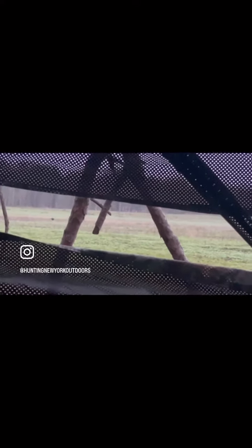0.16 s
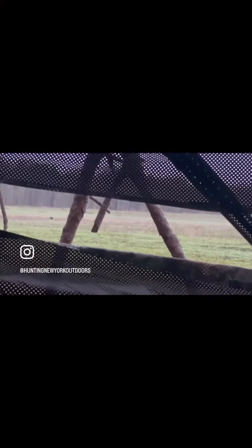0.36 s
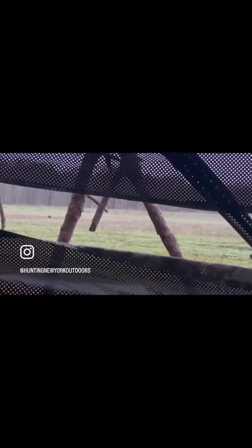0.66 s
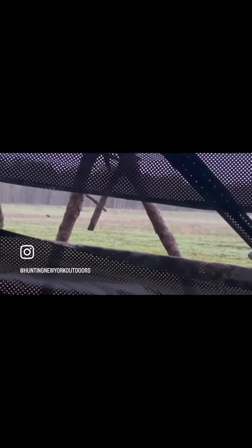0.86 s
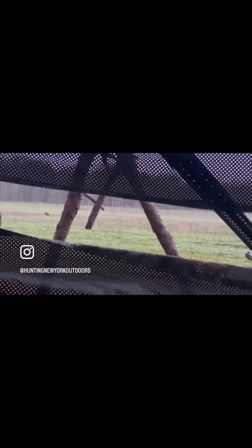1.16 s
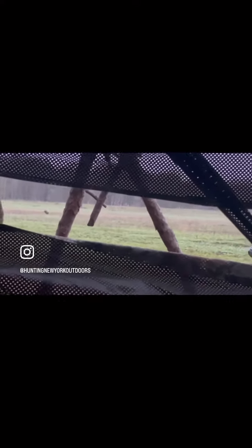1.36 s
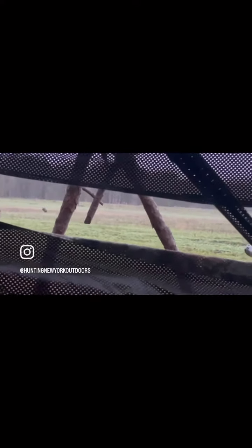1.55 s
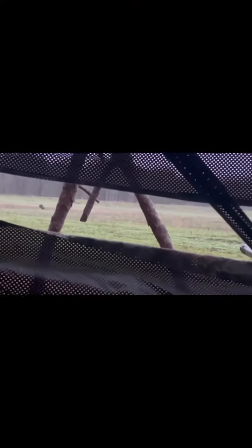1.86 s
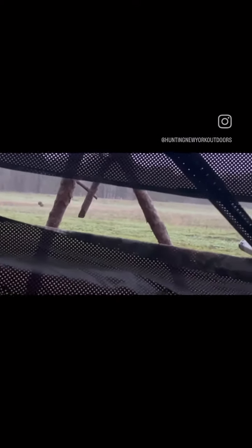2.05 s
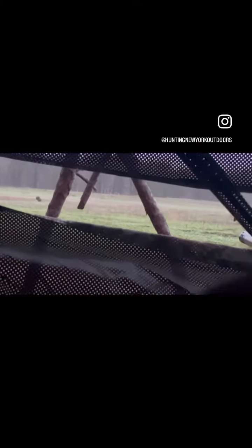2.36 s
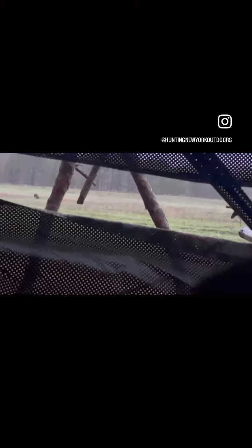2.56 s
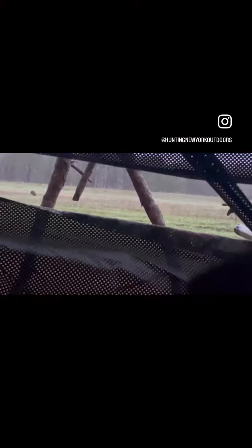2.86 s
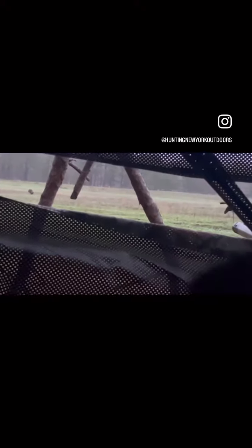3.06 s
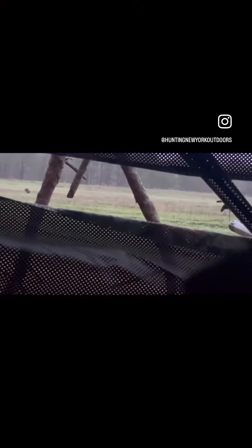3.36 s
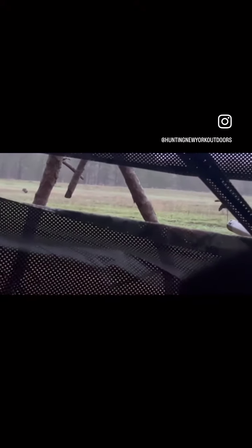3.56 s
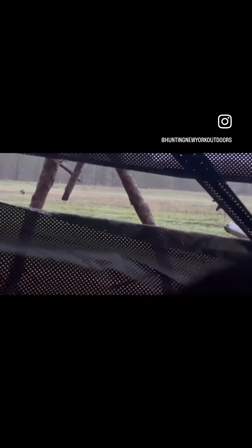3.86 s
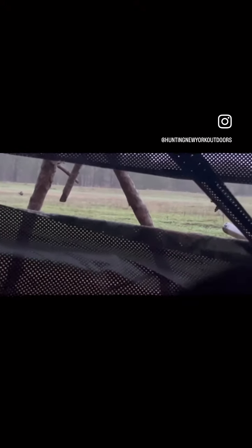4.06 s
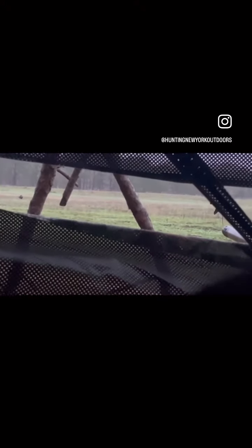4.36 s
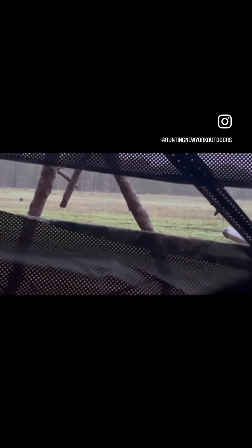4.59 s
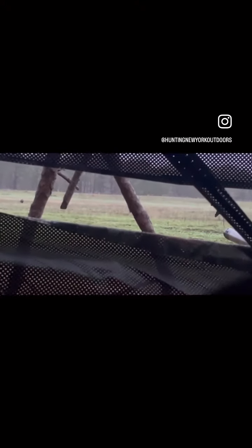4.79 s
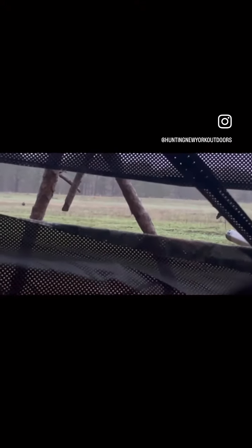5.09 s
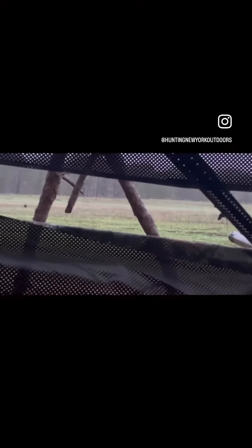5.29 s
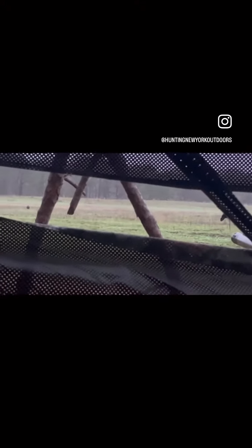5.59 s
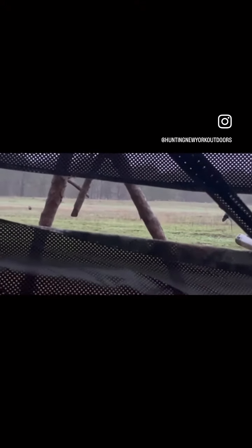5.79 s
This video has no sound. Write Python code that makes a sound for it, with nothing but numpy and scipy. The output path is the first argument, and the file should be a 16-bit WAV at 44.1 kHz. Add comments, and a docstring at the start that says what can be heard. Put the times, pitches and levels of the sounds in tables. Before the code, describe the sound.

A quiet outdoor bed of low rumble and faint thin hiss, heard from within a fabric blind at a field's edge. Very faint and far off, a songbird gives a fast run of falling high chirps from 0.1 to about 2.5 s, then a slower run of hooked, upswinging syllables from 3.1 to 4.5 s. Another bird drops short sliding whistles, clearest near 0.8, 1.5, 4.0 and 4.6 s, with woodland echo. Close by, fabric rustles in soft strokes, strongest at 2.3, 2.9, 4.0 and 4.3 s, with dull little bumps; tiny sharp gear ticks fall at 1.2, 2.0, 2.5, 3.4 and 5.2 s. From 5.2 to 5.9 s a turkey gives four loud, raspy yelps, each 0.1 to 0.16 s, breaking from a thin whistle into a buzzing low note. The gaps widen slightly; a faint low thump closes the last while the rumble dips.

```python
"""At the edge of a field, close to a fabric hunting blind, a turkey gives four loud, raspy yelps.
Each is a membrane buzzing into a throat: a thin whistle that breaks down into a rough low note.
Before them one songbird trills and another whistles far off, as gliding near-sines with echoes.
The fabric rustles and bumps as coloured noise, gear ticks as short noise bursts,
and beneath lie a thin hiss and a low outdoor rumble, which is turned down during the yelps."""
import sys
import numpy as np
from scipy import signal
from scipy.fft import rfft, irfft, next_fast_len
from scipy.io import wavfile
from scipy.ndimage import uniform_filter1d

SR = 44100
rng = np.random.default_rng(int(sys.argv[2]) if len(sys.argv) > 2 else 0)


def wav_out(sig):
    """Save sig, one row per channel (or a flat mono array), as 16-bit PCM at SR to the path in sys.argv[1]."""
    wavfile.write(sys.argv[1], SR, np.round(np.clip(np.atleast_2d(sig).T, -1, 1) * 32767).astype(np.int16))


N = 261513
TIME = np.arange(N) / SR
CUTOFF_HZ = 15650  # upper limit of the voice's partials and of the recorded band


def amp(db):
    """Level: every 20 dB is a factor of ten in amplitude."""
    return 10 ** (np.asarray(db) / 20)


def unit(x):
    """Normalization: scales the mean power to 1."""
    return x / np.sqrt(np.mean(x ** 2) + 1e-20)


def read(points, hz, axis=1):
    """Interpolation: reads a column of a spectrum on a log-frequency axis."""
    rows = np.array(points)
    return np.interp(np.log(hz + 1), np.log(rows[:, 0] + 1), rows[:, axis])


def curves(rows, t):
    """Interpolation: reads every column of a timed table at the times t."""
    s, *columns = np.transpose(rows)
    return [np.interp(t, s, column) for column in columns]


def add(mix, s, sound):
    """Superposition: sums a sound into the mix from time s."""
    part = mix[max(round(s * SR), 0):][:len(sound)]
    part += sound[:len(part)]


def bins(x):
    """Fourier analysis: the frequencies of the spectrum of x."""
    return np.fft.rfftfreq(x.shape[-1], 1 / SR)


def colour(x, points):
    """Linear filtering: multiplies the spectrum by a frequency response."""
    return irfft(rfft(x) * amp(read(points, bins(x))), x.shape[-1])


def noise(points, size):
    """Filtered noise: white noise shaped by a spectrum, at rms 1."""
    white = rng.standard_normal(next_fast_len(size))
    return unit(colour(white, points)[:size])


def wander(size, hz):
    """Random modulation: low-passed noise of rms 1, up to about hz."""
    white = rng.standard_normal(size)
    smooth = irfft(rfft(white) * np.exp(-(bins(white) / hz) ** 2), size)
    return unit(smooth)


def steady(x, size=260):
    """Envelope flattening: divides a sound by its short-term rms."""
    power = uniform_filter1d(uniform_filter1d(x ** 2, size), size)
    return x / np.sqrt(np.abs(power) + 1e-12)


def scatter(x, t60, delay):
    """Diffuse scattering: sparse echoes of random sign, each band decaying at its own rate."""
    taps = rng.choice([-1., 1.], SR) * (rng.random(SR) < .1) * (TIME[:SR] > delay)
    hz, t, z = signal.stft(taps, SR, nperseg=256)
    decay = amp(-60 * t / read(t60, hz)[:, None])
    tail = signal.istft(z * decay, SR, nperseg=256)[1]
    return signal.fftconvolve(x, tail / np.linalg.norm(tail))[:N]


# the yelps: start_s, length_s, attack_s, level_db, sag_db_per_s, middle_swell_db,
# whistle_softening_db_per_octave, treble_db, treble_fade_db_per_s, open_beak_hz
YELP_ROWS = [(5.2105, .1035, .0135, -13.2, 90, 1, 2, -22.3, -55, 4700),
             (5.331, .102, .017, -10.3, 200, 14, 7, -21.7, 60, 3800),
             (5.506, .143, .022, -18.6, -70, 16, 1, -34, 95, 3850),
             (5.758, .159, .042, -13.2, -45, 22, 2, -34, 57, 4850)]
# the membrane of each yelp, from whistle to low note: time_s, pitch_hz, rasp (0-1)
MEMBRANE_CURVES = [
    [(5.213, 2250, .1), (5.222, 2060, .05), (5.226, 740, .8), (5.234, 722, .5), (5.245, 710, .04),
     (5.258, 709, .2), (5.275, 770, .85), (5.29, 919, .35), (5.298, 880, .85)],
    [(5.335, 1790, .5), (5.346, 1800, .15), (5.349, 990, .12), (5.357, 945, .025), (5.368, 972, .008),
     (5.38, 974, .008), (5.391, 990, .06), (5.402, 1037, .07), (5.42, 1065, .8)],
    [(5.515, 2120, .08), (5.523, 1570, .04), (5.548, 1100, .12), (5.572, 795, .5), (5.597, 701, .7),
     (5.607, 898, .35), (5.622, 822, .95)],
    [(5.77, 2800, .08), (5.781, 1920, .03), (5.802, 2010, .01), (5.807, 725, .97), (5.83, 698, .26),
     (5.848, 698, .08), (5.877, 682, .3), (5.889, 600, .97)],
]
# a tiny pip as the voice catches on the last yelp: start_s, length_s, first_hz, last_hz, level_db
CATCH_PIP = (5.766, .011, 3300, 2400, -45)
# a low falling tone of the voice that ends the last yelp: start_s, length_s, first_hz, last_hz, level_db
END_GLIDE = (5.84, .066, 240, 140, -34.5)
# echo decay of the open field: frequency_hz, t60_s
FIELD_DECAY = [(200, .2), (1000, 0.067), (3000, 0.12), (10000, 0.05)]
# response of two microphone ports: frequency_hz, left_minus_right_db, left_lead_rad
PORT_RESPONSE = [(20, 0, 0), (520, 0, 0), (700, 2.2, -.35), (900, -.7, -.2), (1250, -2.5, .2),
                 (1420, 0, .7), (1700, -5, .2), (1900, 10.5, .6), (2120, 10.5, .4), (2260, 3.7, -.6),
                 (2550, 0, 0), (6400, 0, 0), (7500, 0, -2.2), (9300, 0, -4.1), (9700, 0, -6.28)]


def turkey(field_db=-33):
    """Direct and scattered sound: yelps with a faint field echo, differing in level and phase at two ports."""
    direct = np.zeros(N)
    for row, membrane in zip(YELP_ROWS, MEMBRANE_CURVES):
        add(direct, *yelp(row, membrane))
    add(direct, *note(*CATCH_PIP))
    add(direct, *note(*END_GLIDE))
    field = scatter(direct, FIELD_DECAY, delay=.004)
    sound = np.pad(direct + amp(field_db) * field, (0, SR))
    hz = bins(sound)
    ratio = amp(read(PORT_RESPONSE, hz, axis=1))
    lead = np.exp(1j * read(PORT_RESPONSE, hz, axis=2))
    ports = np.array([ratio, 1 / lead]) * 2 / (1 + ratio)
    return irfft(rfft(sound) * ports, sound.shape[-1])[:, :N]


# throat colour of the clean tone: frequency_hz, relative_level_db
THROAT_RESPONSE = [(300, -9.5), (700, 10.5), (1000, -1.5), (1400, 1), (1950, 0.5), (2150, 3), (2600, -19),
                   (2900, -26), (3550, -19.5), (4400, -36), (5800, -28), (7300, -37.5), (10200, -38),
                   (14000, -61)]
# throat colour of the rasp: frequency_hz, relative_level_db
RASP_RESPONSE = [(70, -34), (135, -21), (240, -20), (365, -2.5), (490, 0), (580, -3), (1000, 9),
                 (1500, 6.5), (2000, 6), (2300, 0), (2500, -6), (2800, -11), (3150, -13.5), (3550, -9),
                 (4000, -14.5), (5300, -20), (5850, -16), (6500, -18.5), (7400, -15.5), (10200, -24),
                 (13000, -43.5), (14200, -58), (15200, -82)]
BEAK_SHUT_HZ, BEAK_SKEW = 3200, .85  # opens and closes once a yelp, widest a little before the middle


def yelp(row, membrane, jitter=0.032, tremor=0.004, halves_db=-.5, treble_rasp_db=1,
         beak_db=7, beak_width_hz=330, split_hz=2550):
    """Source and filter: a membrane buzzes into the throat; rasp brings subharmonics and turbulence."""
    start, length, *_, open_hz = row
    u = np.linspace(0, 1, round(length * SR))
    t = start + length * u
    hz, rasp = curves(membrane, t)
    level_db, treble_db = loudness(row, t, hz)
    opening = np.sin(np.pi * u ** BEAK_SKEW) ** 2
    beak_hz = BEAK_SHUT_HZ + (open_hz - BEAK_SHUT_HZ) * opening
    rasp = np.clip(rasp, .003, .97)
    hz = hz * (1 + (tremor + jitter * rasp) * wander(len(t), 330))
    phase = 2 * np.pi * np.cumsum(hz) / SR
    k = np.arange(1, 23)[:, None]
    offset = rng.uniform(0, 2 * np.pi, (2, len(k), 1))

    # the two lowest partials are firm; higher ones are weaker, and each flutters on its own
    flutter, slip, stumble = np.array([[wander(len(t), 110) for _ in k] for _ in range(3)])
    loose = np.clip((k - 2) / 3, 0, 1)
    # a thin whistle has hardly more than two partials
    thin_db = 14 * np.clip(hz / 1000 - 1, 0, .5) * 2 * (k > 2)
    partial_db = read(THROAT_RESPONSE, k * hz) - thin_db + loose * (3 * flutter - 5)
    partials = amp(partial_db) * (k * hz < CUTOFF_HZ)
    tone = (partials * np.cos(k * phase + offset[0] + .7 * loose * slip)).sum(0)

    # strong and weak cycles in turn put unsteady lines halfway between the harmonics
    between = (k - .5) * hz
    half_gain = amp(read(RASP_RESPONSE, between) + 5 * stumble) * (between < CUTOFF_HZ)
    halves = (half_gain * np.cos((k - .5) * phase + offset[1] + .5 * slip)).sum(0)

    # air escapes in one puff a cycle
    puffs = colour(rng.standard_normal(len(t)) * (1 + 0.31 * np.cos(phase)), RASP_RESPONSE)
    rough = steady(steady(puffs) + amp(halves_db) * steady(halves))
    parts = np.array([np.sqrt(1 - rasp) * steady(tone), np.sqrt(rasp) * rough])

    # the treble opens and closes against the body of the note, and rings in the moving beak
    body = irfft(rfft(parts) / (1 + (bins(t) / split_hz) ** 20), len(t))
    clean_treble, rough_treble = parts - body
    treble = clean_treble + amp(treble_rasp_db) * rough_treble
    treble = treble + amp(beak_db) * beak(treble, beak_hz, beak_width_hz)
    voice = amp(level_db) * steady(body.sum(0), size=140) + amp(treble_db) * steady(treble, size=200)
    return start, voice * signal.windows.tukey(len(t), .03)


ONSET_DB, RELEASE_DB, RELEASE_S = 42, 42, .03  # rise from and fall to this far under the level
LOW_NOTE_HZ = 750  # above this pitch the voice softens


def loudness(row, t, hz):
    """Amplitude envelope: attack, sagging hold and release for a yelp's body and treble."""
    start, length, attack, level_db, sag, swell_db, soften_db, treble_db, treble_fade, _ = row
    rising = np.maximum(1 - (t - start) / attack, 0)
    closing = np.maximum(1 - (start + length - t) / RELEASE_S, 0)
    ends_db = -ONSET_DB * rising ** 1.5 - RELEASE_DB * closing ** 1.4
    from_middle = t - start - length / 2
    arch_db = swell_db * (2 * from_middle / length) ** 2
    octaves_up = np.maximum(np.log2(hz / LOW_NOTE_HZ), 0)
    body_db = level_db - sag * from_middle - arch_db - soften_db * octaves_up
    return body_db + ends_db, treble_db - treble_fade * from_middle + ends_db


def beak(x, hz, width_hz):
    """Resonance: a moving peak of gain 1, shifted to zero frequency, smoothed and shifted back."""
    turn = np.exp(2j * np.pi * np.cumsum(hz) / SR)
    r = np.exp(-np.pi * width_hz / SR)
    return 2 * (turn * signal.lfilter([1 - r], [1, -r], x / turn)).real


# falling trill syllable: time_s from the middle of the downsweep, pitch_hz, relative_level_db
FALLING_SYLLABLE = [(-.02, 7600, -22), (-.013, 7100, -7), (-.006, 6000, 0), (.002, 4800, -1),
                    (.012, 3700, -5), (.021, 3000, -15)]
# hooked syllable that swings up again: time_s from the downsweep's middle, pitch_hz, relative_level_db
HOOKED_SYLLABLE = [(-.028, 7000, -14), (-.015, 5900, 0), (-.003, 4900, 0), (.011, 3950, -6),
                   (.022, 3300, -20), (.032, 5300, -26), (.04, 6400, -6), (.053, 7020, -3),
                   (.066, 7200, -6), (.076, 7000, -24)]
# run of falling syllables: first_s, period_s, lengthening_s per period, loudest_db,
# place of the loudest (0-1), fade_db a whole run away from it
FALLING_RUN = (.108, .1042, .00041, -63.3, .62, 22)
# run of hooked syllables: the same columns
HOOKED_RUN = (3.062, .1235, .00048, -61.3, .66, 28)
# notes of the whistling bird: start_s, length_s, first_hz, last_hz, level_db
WHISTLED_NOTES = [(.02, .06, 3030, 2850, -77), (.12, .05, 3450, 3150, -75), (.13, .12, 2500, 2200, -80),
                  (.25, .14, 2500, 2200, -76), (.72, .043, 3400, 2260, -67),
                  (.763, .048, 2980, 2370, -62.5), (.812, .06, 2810, 2290, -64),
                  (.86, .065, 2275, 2255, -65.5), (1.34, .055, 3620, 3400, -78),
                  (1.498, .075, 3380, 2740, -65), (1.59, .16, 3000, 2040, -72),
                  (3.32, .22, 2750, 2450, -76), (3.85, .08, 3000, 2510, -77),
                  (4.012, .075, 3640, 2770, -58), (4.13, .17, 2850, 2050, -71),
                  (4.58, .122, 3550, 2200, -57), (4.7, .04, 2280, 2850, -65), (4.73, .08, 2860, 2930, -58),
                  (4.797, .045, 2950, 2350, -61)]
# echo decay among the trees around the deeper notes: frequency_hz, t60_s
TREES_DECAY = [(2000, .22), (3500, .18)]
# echo decay of the woods' edge: frequency_hz, t60_s
WOODS_DECAY = [(1000, 1), (2500, .36), (4500, .3), (7500, .2)]
NEAR_NOTE_DB, BLUR_SPAN_DB = -68, 8  # fainter notes come from deeper in: this far below, all blur


def songbirds(trill_woods_db=-5.5, note_woods_db=-10):
    """Reverberation: two far birds, direct and echoed by the edge of the woods."""
    trill, notes, deep = np.zeros((3, N))
    falling = FALLING_SYLLABLE, syllables(FALLING_RUN, count=23)
    hooked = HOOKED_SYLLABLE, syllables(HOOKED_RUN, count=12)
    for shape, run in (falling, hooked):
        for s, db in run:
            # every point of a syllable strays a little in pitch (Hz) and level (dB)
            stray = rng.standard_normal((len(shape), 3)) * [0, 50, 1.5]
            start, sound = whistle(np.array(shape) + stray)
            add(trill, s + start, amp(db) * sound)
    # near trunks and ground ripple each sweep and blur its trailing edge
    trill = .85 * trill + .5 * scatter(trill, [(3000, .12), (8000, .12)], delay=.001)
    for row in WHISTLED_NOTES:
        start, sound = note(*row)
        blur = np.clip((NEAR_NOTE_DB - row[-1]) / BLUR_SPAN_DB, 0, 1)
        add(notes, start, np.sqrt(1 - blur) * sound)
        add(deep, start, np.sqrt(blur) * sound)
    notes = notes + scatter(deep, TREES_DECAY, delay=.001)
    sent = amp(trill_woods_db) * trill + amp(note_woods_db) * notes
    return trill + notes + scatter(sent, WOODS_DECAY, delay=0.007)


def syllables(run, count):
    """Rhythm: times and levels of a trill that slows a little as it swells and fades."""
    first, period, slowing, top_db, crest, fade_db = run
    k = np.arange(count)
    times = first + period * k + slowing * k ** 2 / 2
    return zip(times, top_db - fade_db * (k / (count - 1) - crest) ** 2)


NOTE_EASE, NOTE_ARCH_DB = 1.2, 7  # pitch moves fastest at first; the ends lie this far under the middle


def note(start, length, first_hz, last_hz, db):
    """Glide: a pitch that moves and levels off while the level swells in the middle."""
    u = np.linspace(0, 1, 20)
    hz = last_hz + (first_hz - last_hz) * (1 - u) ** NOTE_EASE
    level_db = db - NOTE_ARCH_DB * (2 * u - 1) ** 2
    return whistle(np.transpose([start + length * u, hz, level_db]))


def whistle(rows):
    """Frequency modulation: one nearly pure tone whose phase sums its gliding pitch."""
    t = np.arange(rows[0][0], rows[-1][0], 1 / SR)
    hz, db = curves(rows, t)
    phase = 2 * np.pi * np.cumsum(hz * (1 + .003 * wander(len(t), 150))) / SR
    return t[0], np.sqrt(2) * amp(db) * np.sin(phase) * signal.windows.tukey(len(t), .15)


# sharp ticks of gear: start_s, level_db (of the whole burst's energy), brightness_db_per_octave
GEAR_TICKS = [(1.2330, -25, -9), (1.2356, -25.5, 10), (1.966, -22, -1), (1.9672, -21.5, -4),
              (2.5202, -25, 14), (2.5236, -26, -7), (3.4032, -20.5, -7.5), (5.025, -33.5, -4),
              (5.199, -26, -16)]
# tick spectrum before the brightness tilt: frequency_hz, relative_level_db
TICK_SPECTRUM = [(300, -16), (1000, 0), (1600, -26), (2200, 8.5), (3000, 2.5), (4500, 3), (6800, 2.5),
                 (8500, -63), (13000, -27), (15000, -58)]


def ticks(snap_s=0.0015, ring_s=0.01, ring_db=-19):
    """Impact: small hard snaps of noise with a fast decay and a weaker, slightly longer ring."""
    out, t = np.zeros(N), TIME[:2048]
    decay = np.exp(-t / snap_s) + amp(ring_db) * np.exp(-t / ring_s)
    for s, db, tilt in GEAR_TICKS:
        tilted = [(hz, level + tilt * np.log2(hz / 3000)) for hz, level in TICK_SPECTRUM]
        snap = noise(tilted, len(t)) * decay
        add(out, s, amp(db) * snap / np.linalg.norm(snap))
    return out


# spectrum of the rustle: frequency_hz, relative_level_db
RUSTLE_SPECTRUM = [(120, -27), (240, 2.5), (340, 6.5), (450, 0), (540, .5), (850, -1), (1250, -8),
                   (2000, -60)]
# spectrum of the brighter scrape: frequency_hz, relative_level_db
SCRAPE_SPECTRUM = [(600, -20), (1200, 1), (1650, -2.5), (2150, -6), (2700, -17), (6000, -22), (9000, -36),
                   (15000, -55)]
# soft bumps against the blind: start_s, level_db, decay_s, brightness_db_per_octave
BLIND_BUMPS = [(1.332, -45.5, 0.0047, 10), (1.339, -43.5, 0.017, -3), (1.3672, -47, 0.0048, 9),
               (2.6946, -36, 0.0044, 4), (2.7368, -42.5, .007, 7.5), (3.718, -48.5, 0.0046, 20),
               (3.945, -39, 0.016, 4.5), (4.044, -38, 0.0032, 10)]
# bump spectrum before the brightness tilt: frequency_hz, relative_level_db
BUMP_SPECTRUM = [(40, -36), (160, 20.5), (400, 9), (800, -3), (1300, -39), (3000, -75), (9000, -70)]


def blind(flutter_db=2.6):
    """Friction and impact: fabric rubs as fluttering noise and takes a few dull decaying bumps."""
    rustle, scrape = rubbing()
    out = rustle * noise(RUSTLE_SPECTRUM, N) + scrape * noise(SCRAPE_SPECTRUM, N)
    out *= amp(flutter_db * wander(N, 52))
    t = TIME[:8192]
    for s, db, decay, tilt in BLIND_BUMPS:
        tilted = [(hz, level + tilt * np.log2(min(hz, 1000) / 400)) for hz, level in BUMP_SPECTRUM]
        envelope = np.exp(-t / decay) * (1 - np.exp(-t / .0004))
        add(out, s, amp(db) * steady(noise(tilted, len(t))) * envelope)
    return out


# strokes of rubbing fabric: strongest_s, length_s, rustle_db, scrape_db (levels before the flutter)
RUB_STROKES = [(.36, .22, -67.5, -83), (.7, .2, -68, -90), (.87, .045, -67, -72), (1.16, .1, -66, -80),
               (1.56, .1, -55.5, -77), (1.71, .13, -57.5, -77), (1.98, .2, -68, -76),
               (2.29, .105, -53.5, -66.5), (2.745, .14, -58.5, -73), (2.885, .1, -46.5, -61.5),
               (2.99, .13, -58, -77), (3.27, .08, -60, -72), (3.5, .4, -62, -75), (4, .1, -51, -63),
               (4.12, .13, -60, -59.5), (4.3, .11, -51.5, -67), (4.42, .4, -61.5, -66),
               (4.97, .3, -60.5, -69), (5.6, .4, -72, -73)]
STROKE_LAG = 1.4  # a stroke dies away this many times more slowly than it builds


def rubbing(rest_db=-76, scrape_rest_db=-88):
    """Power addition: smooth strokes over a constant faint stir give the rustle and scrape gains."""
    t = TIME[::64]
    power = amp([[rest_db], [scrape_rest_db]]) ** 2 * np.ones(len(t))
    for s, length, db, scrape_db in RUB_STROKES:
        reach = length / (1 + STROKE_LAG) * np.where(t < s, 1, STROKE_LAG)
        power = power + amp([[db], [scrape_db]]) ** 2 * np.exp(-((t - s) / reach) ** 2)
    return [np.interp(TIME, t, np.sqrt(p)) for p in power]


# spectrum of the outdoor rumble: frequency_hz, relative_level_db
RUMBLE_SPECTRUM = [(15, -45), (25, -27), (40, -13), (65, 2.5), (110, -1.5), (200, -7), (360, -14),
                   (520, -23), (880, -27), (1250, -35), (2000, -48.5), (8000, -78.5)]
# rumble as the recorder's gain control passes it, drawn as a set curve that drops during the yelps,
# before the overall gain: time_s, level_db
RUMBLE_LEVEL = [(0, -56.5), (1.2, -54.5), (1.7, -54.5), (2.4, -52.5), (3.2, -52), (5.1, -54), (5.6, -62),
                (5.93, -66)]
# spectrum of the thin hiss: frequency_hz, relative_level_db
HISS_SPECTRUM = [(100, -20), (900, 2), (1650, -2), (2300, 2), (3200, -1), (6500, -2), (7600, -5),
                 (10000, -15), (13000, -19), (14500, -30), (16000, -38)]


def air(rumble_gain_db=-3.5, hiss_db=-79):
    """Ambient noise: a low rumble that the recorder's gain control turns down during the yelps, and hiss."""
    level_db, = curves(RUMBLE_LEVEL, TIME)
    rumble = amp(level_db + rumble_gain_db) * noise(RUMBLE_SPECTRUM, N)
    return rumble + amp(hiss_db) * noise(HISS_SPECTRUM, N)


def scene(side_db=-20):
    """Mid and side: the surroundings sit in the middle, with a little scattered width above the bass."""
    around = songbirds() + ticks() + blind() + air()
    no_bass = signal.butter(2, 800, "high", fs=SR, output="sos")
    side = amp(side_db) * signal.sosfilt(no_bass, scatter(around, FIELD_DECAY, delay=.001))
    return turkey() + np.array([around + side, around - side])


# a narrow notch of the microphone: frequency_hz, gain_db
MICROPHONE_NOTCH = [(7500, 0), (7800, -9), (8250, -22), (8700, -9), (9500, 0)]


def record(dry):
    """Transduction: a narrow notch, soft saturation of the highest peaks, then the band limit."""
    heard = colour(np.pad(dry, ((0, 0), (0, 4096))), MICROPHONE_NOTCH)[:, :N]
    heard = heard / (1 + (heard / .92) ** 10) ** .1
    low_pass = signal.firwin(511, CUTOFF_HZ, window=("kaiser", 9), fs=SR)
    return signal.oaconvolve(heard, low_pass[None], "same")


dry = scene()
out = record(dry)
wav_out(out)
```